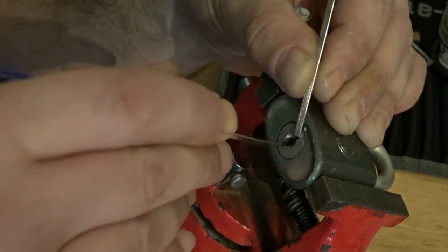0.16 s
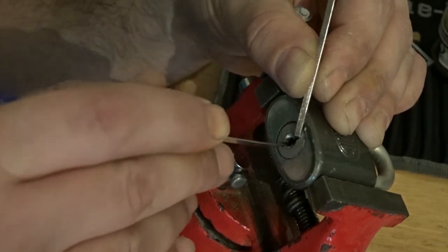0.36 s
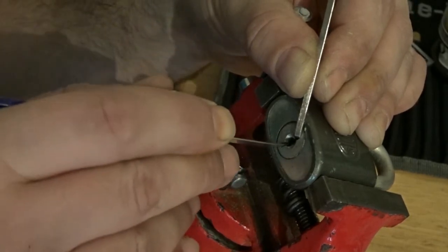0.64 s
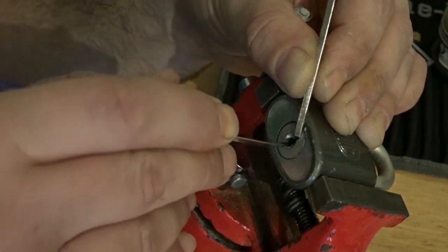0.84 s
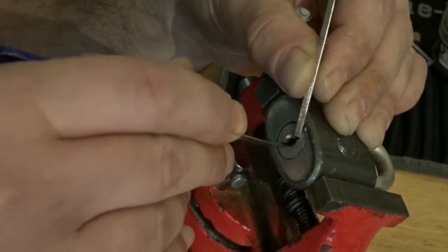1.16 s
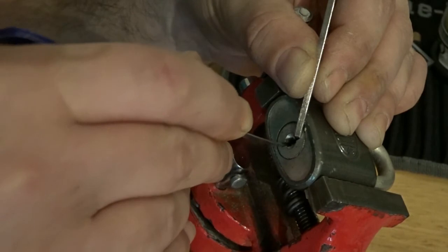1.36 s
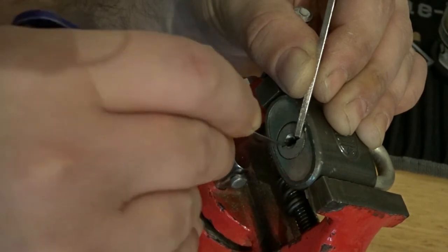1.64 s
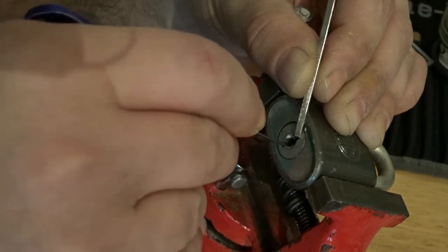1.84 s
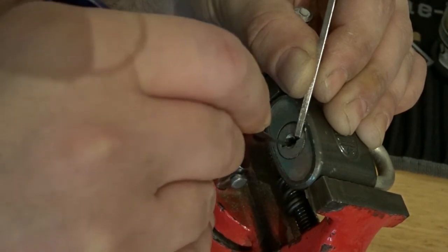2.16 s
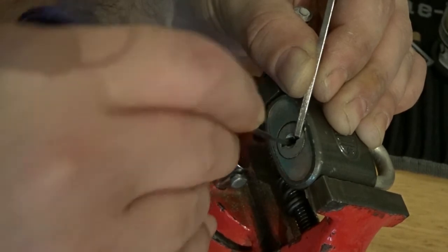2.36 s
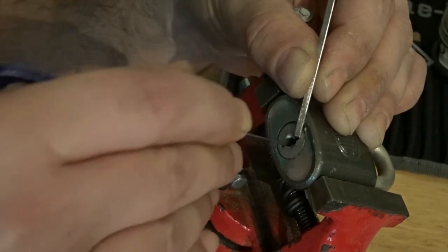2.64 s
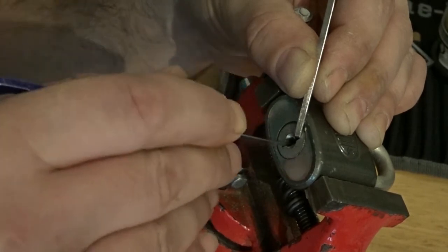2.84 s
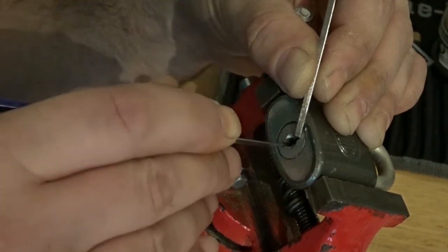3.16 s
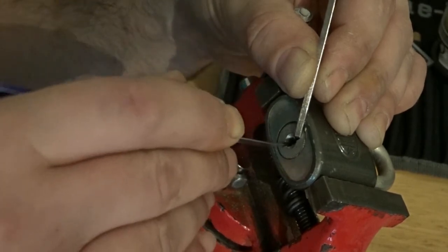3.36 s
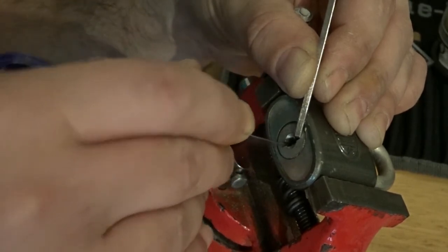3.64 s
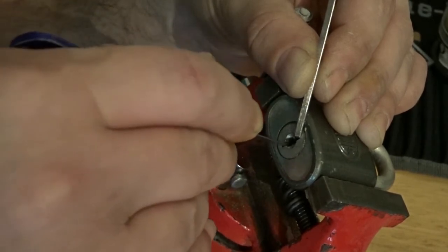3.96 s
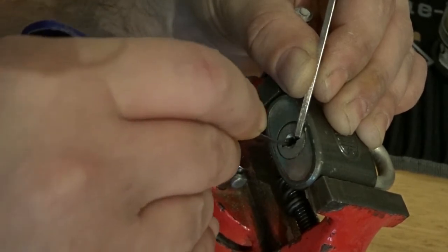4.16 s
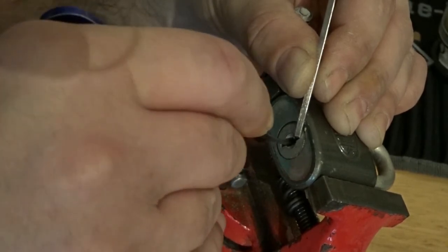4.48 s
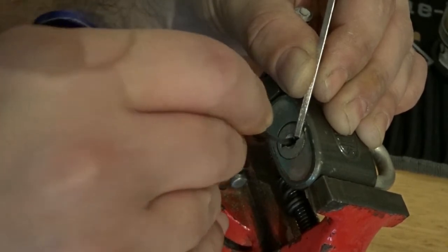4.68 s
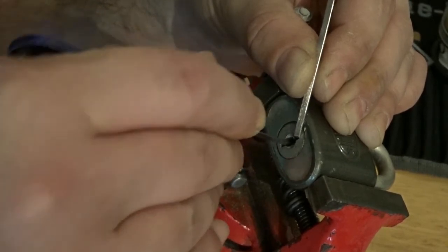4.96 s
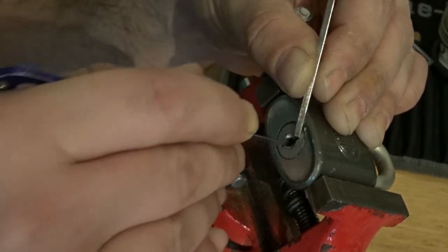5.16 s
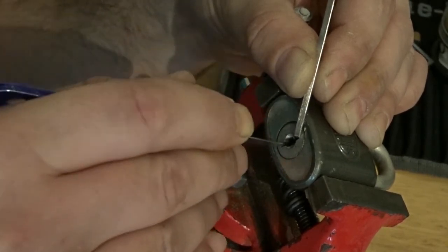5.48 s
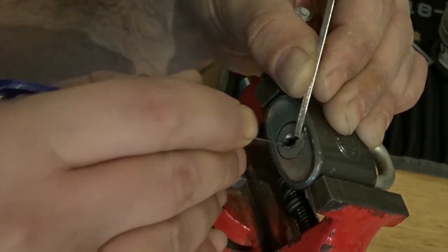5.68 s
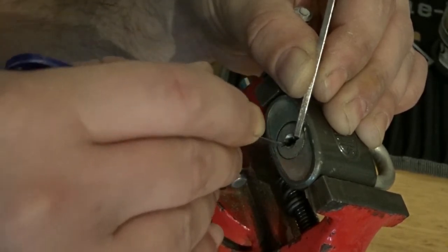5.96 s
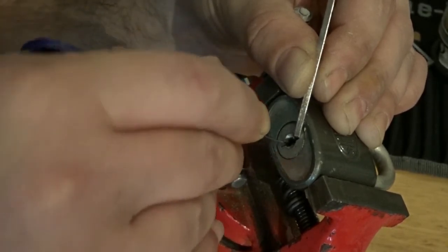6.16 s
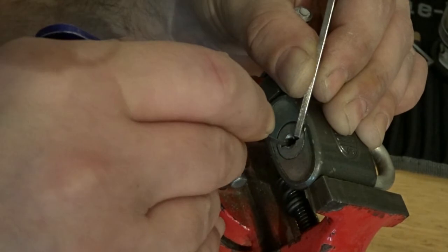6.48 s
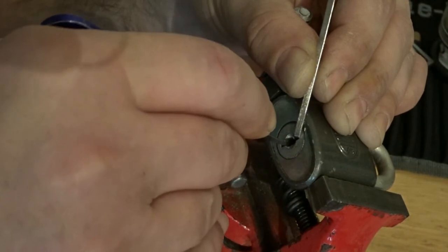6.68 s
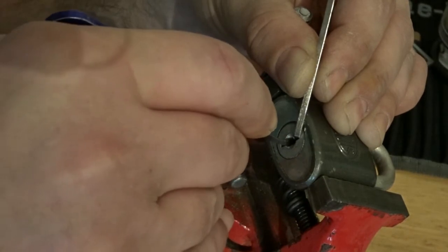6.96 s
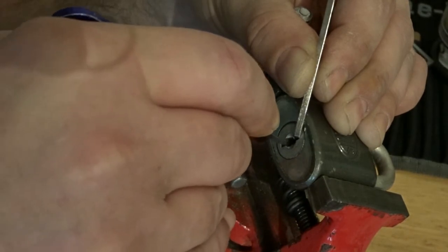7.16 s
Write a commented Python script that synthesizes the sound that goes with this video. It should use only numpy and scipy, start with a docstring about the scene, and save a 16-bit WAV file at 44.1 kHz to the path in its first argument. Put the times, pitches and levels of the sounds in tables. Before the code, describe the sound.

A pick slips inside a clamped padlock with irregular ringing clicks and soft bench thumps, until the lock snaps open.

```python
"""A padlock is picked in a bench vice, close up and in stereo, over a small workshop's faint hum and hiss.
From 0.4 s the pick slips off the pins in scattered clicks: each snaps, rings the thin steel and thumps
the bench, while soft pushes only thud. At 3 s something knocks once further off. A hard slip lands at
4.7 s, lighter ones follow, and near 7.3 s the lock gives way with a loud rattling snap."""
import sys
import numpy as np
from scipy import signal
from scipy.fft import rfft, irfft
from scipy.io import wavfile

SR = 44100
rng = np.random.default_rng(int(sys.argv[2]) if len(sys.argv) > 2 else 0)


def master_out(mix):
    """Clip the mix to full scale and print it as 16-bit PCM to the path in sys.argv[1]."""
    frames = np.transpose(np.atleast_2d(mix))
    ceiling = np.clip(frames, -1, 1)
    pcm = np.round(ceiling * 32767).astype(np.int16)
    wavfile.write(sys.argv[1], SR, pcm)


N = 322812
HIT_TIME = np.arange(SR // 2) / SR
FILTER_HZ = np.fft.rfftfreq(4096, 1 / SR)

# Cue list, one slip of the pick a row; clack, top and rattle are relative to the snap:
# (time [s], snap [dB], contact decay [s], clack near 1 kHz [dB], top near 13 kHz [dB], bite pitch [Hz],
#  rattle [dB], steel ring [dB], steel pitch [ratio], bench thump [dB])
SLIPS = [ (0.3860, -25.5, 0.0015, -2.5, -20, 8420, -7, -30, 1, -4),
         (0.4241, -7.5, 0.0034, -10, -2.5, 4750, -17, 6.5, 0.97, 2.5),
         (0.5810, -30, .003, 0.5, -12, 5170, -10, -21, 1.25, -23),
         (2.2862, -37, 0.002, 3, -19, 4500, -11, -40, 1.1, -35),
         (2.4590, -45, .002, 2, -16, 4800, -8, -23, .98, -28),
         (2.5010, -28.5, 0.0025, -11, -15, 4920, -7, -16, 1.02, -13.5),
         (2.5880, -16.5, 0.0014, -4, -7, 4800, -8.5, -8, 1.025, 0),
         (4.6927, -3, 0.0045, 2.5, -2.5, 6250, -15, -21, 1.04, 12),
         (5.4670, -18, .0027, -4, 6.5, 4890, -9, -5.5, .99, 2.5),
         (6.1066, -40, .0025, 0, -13, 7550, 0, -27, .96, -29),
         (7.182, -17.5, .0055, 1.5, 1, 8240, -3.5, -1.5, 1.02, -3),
         (7.2580, -25, .0016, 6, -40, 5570, -16, -9, 0.96, -2),
         (7.2680, 4, 0.00083, -30, -4, 5560, -2.5, -15, 0.52, 1),
         (7.2695, 0.5, 0.0016, -2, 2, 8100, 2, -12, 0.61, 13.5),
         (7.296, -3, 0.00093, 0, -4, 7200, 3, -12, 1, 8.5), ]
# Bright, hard EQ of the snap: (frequency [Hz], gain [dB])
SNAP_EQ = [(40, -43), (200, -11), (750, -5), (1100, 1.5), (2000, -3), (3300, -2), (4100, -4), (5000, -2.5),
           (6700, -3.5), (7700, -10.5), (8600, -5.5), (10500, -9), (12700, -5.5), (14000, -11), (15300, -7),
           (16000, -12)]
# Metallic ring of lock body and vice jaws: (frequency [Hz], level [dB], t60 [s])
LOCK_MODES = [(768, 2, 0.12), (992, 6.5, 0.14), (1017, 4, 0.054), (1296, 1, 0.32), (1633, 6, 0.44),
              (1769, 8, 0.26), (1968, 9.5, 0.2), (2255, 2.5, 0.14), (2434, -0.5, 0.14)]
# Short ping of pick and tension wrench, damped by the fingers: (base frequency [Hz], level [dB], t60 [s])
STEEL_MODES = [(2616, -3, 0.016), (2740, 1, 0.033), (2855, -5.5, 0.021), (3500, -26, 0.066),
               (4517, -16, 0.028), (5440, -20, 0.023), (7350, -14, 0.0295), (8070, -10.5, 0.043)]

def pin_slips(steel_lag_s=0.001561, bench_lag_s=0.0018):
    """A pin slips: a hard snap, a rattle of loose parts, then lock body, steel and bench ring on."""
    out = np.zeros((2, N))
    for s, snap_db, contact_s, clack_db, top_db, _, rattle_db, steel_db, pitch, thump_db in SLIPS:
        contact = burst(decay_s=contact_s, width=0.36, grain_db=4.5)
        rattle = amp(rattle_db) * burst(decay_s=0.085, width=1.8, grain_db=3.5)
        hardness_db = curve([(1700, clack_db), (4500, 0), (8000, 0), (13000, top_db)], FILTER_HZ)
        snap = equalise(contact + rattle, curve(SNAP_EQ, FILTER_HZ) + hardness_db)
        add(out, s, amp(snap_db) * snap)
        add(out, s, amp(snap_db + clack_db) * ring(LOCK_MODES))
        # the pick's free length, and so its pitch, changes with its depth in the keyway
        steel = ring([(hz * pitch, db, t60) for hz, db, t60 in STEEL_MODES])
        add(out, s + steel_lag_s, amp(steel_db) * steel)
        # harder thumps reach further down into the bench
        thump = bench(deep_db=-5 + 0.28 * thump_db, top_db=0, sustain=0.98)
        add(out, s + bench_lag_s, amp(thump_db) * thump)
    return out


def pin_bites(above_snap_db=5.5, t60_s=0.0069, detune=0.034):
    """Each pin has a brief pair of resonances that the keyway beams straight at the listener."""
    out = np.zeros((2, N))
    for s, snap_db, _, _, _, hz, *_ in SLIPS:
        bite = ring([(hz * (1 - detune), 0, t60_s), (hz * (1 + detune), 0, t60_s)])
        add(out, s, amp(snap_db + above_snap_db) * bite)
    return out


# Woody low end of the vice on its bench: (frequency [Hz], base level [dB], base t60 [s])
BENCH_MODES = [(105, -8, 0.077), (146.5, 0, 0.29), (198.7, -0.5, 0.168), (292, 0, 0.11), (336, -4, 0.11),
               (388.5, 5.5, 0.097), (446.8, 2.5, 0.13), (609, -6.5, 0.057), (676, -11, 0.11)]

def bench(deep_db, top_db, sustain, attack_cycles=0.91):
    """A low thump whose deepest tones swell in last."""
    out = np.zeros(len(HIT_TIME))
    for k, (hz, db, t60) in enumerate(BENCH_MODES):
        tilt_db = curve([(170, deep_db), (320, 0), (430, 0), (600, top_db)], hz)
        mode = sustain * ring([(hz, db + tilt_db, t60 * sustain)])
        attack = 1 - np.exp(-HIT_TIME * hz / attack_cycles)
        out += (-1) ** k * mode * attack
    return out


# Dull thuds with no snap on top: (time [s], level [dB], deep-mode gain [dB])
PUSHES = [ (0.392, -9, -8), (0.402, 2.5, -16), (0.573, -3, -10), (0.592, -3.5, -5), (2.285, 1.5, 9.5),
          (2.308, -9, 5), (2.328, -15.5, 15.5), (2.369, -3.5, -16), (3.168, -3.5, -1), (4.246, -12, -4),
          (4.317, -6, -3), (5.034, -1.5, -13), (5.066, -4.5, -2), (5.087, -4, -6), (5.728, -7, 2), ]

def soft_pushes():
    """The pushing hand shakes the bench, softens its upper modes and shortens its ring."""
    out = np.zeros((2, N))
    for s, db, deep_db in PUSHES:
        add(out, s, amp(db) * bench(deep_db, top_db=-2, sustain=0.78))
    return out


# Two blows that fuse into one knock, off to the left: (time [s], level [dB], left over right [dB])
KNOCK_BLOWS = [(3.0387, -6, 5.5), (3.0470, -4, -1)]
# Dark, boxy EQ of the knock: (frequency [Hz], gain [dB])
KNOCK_EQ = [(80, -9), (200, -10.5), (305, 5), (420, -1.5), (600, 0.5), (1150, -6.5), (1650, -13),
            (2300, -12.5), (3500, -22.5), (6000, -35), (15000, -57.5)]

def far_knock():
    """A soft, woody double blow with no ring of its own."""
    out = np.zeros((2, N))
    for s, db, pan_db in KNOCK_BLOWS:
        contact = burst(decay_s=0.0092, width=0.095, grain_db=-1.0)
        blow = equalise(contact, curve(KNOCK_EQ, FILTER_HZ))
        add(out, s, amp([[db + pan_db / 2], [db - pan_db / 2]]) * blow)
    return out


# Early reflections off bench, hands and nearby gear: (delay [s], gain [ratio])
REFLECTIONS = [(.0013, 0.21), (.0029, 0.46), (.0047, 0.14), (.0072, 0.35), (.0091, .2), (0.03, 0.15)]

def early_reflections(x):
    """Near surfaces scatter the treble back, a little earlier on one side than on the other."""
    treble = signal.sosfilt(signal.butter(2, 900, "high", fs=SR, output="sos"), x)
    skews_s = 0.0001 * rng.uniform(-1.1, 1, len(REFLECTIONS))
    out = np.zeros((2, N))
    for (delay, gain), skew in zip(REFLECTIONS, skews_s):
        add(out, delay + skew, gain * treble * [[1], [0]])
        add(out, delay - skew, gain * treble * [[0], [1]])
    return out


# Reverb image, centred in the lows and wide on top: (frequency [Hz], left-right correlation [0-1])
REVERB_IMAGE = [(60, 0.99), (400, 0.95), (700, 0.95), (1400, 0.98), (3100, 0.54), (6000, 0), (15000, 0)]
# Short decay of the workshop: (frequency [Hz], t60 [s])
REVERB_DECAY = [(200, .5), (530, 0.45), (1400, 0.78), (3700, 0.58), (9700, 0.69), (15000, 0.24)]
# Tone of the tail: (frequency [Hz], gain [dB])
REVERB_EQ = [(150, 2.5), (400, 0.5), (800, 2), (1700, 2), (4000, -1), (9000, -2), (15000, 2.5)]

def workshop_reverb(x, build_s=0.0023):
    """Dense reflections build up quickly and die at their own speed in each band."""
    noise = stereo_image(rng.standard_normal((2, SR)), REVERB_IMAGE)
    hz, t, bands = signal.stft(noise, SR, nperseg=256)
    rate = np.log(1000) / curve(REVERB_DECAY, hz)[:, None]
    decay = np.exp(-rate * t) * np.sqrt(2 * rate / SR)  # same energy for any t60
    bands *= amp(curve(REVERB_EQ, hz))[:, None] * decay
    tail = signal.istft(bands, SR, nperseg=256)[1][:, :SR]
    attack = 1 - np.exp(-(np.arange(SR) / SR / build_s) ** 2)
    return signal.fftconvolve(x, tail * attack, axes=1)[:, :N]


# Fader ride of the workshop's low drone: (time [s], level before trim [dB])
DRONE_FADER = [(0.0, -83), (0.34, -67), (0.92, -79.5), (1.06, -64.5), (1.84, -77), (2.12, -68), (3.18, -75),
               (3.64, -71), (4.22, -84), (4.48, -70), (4.74, -68), (4.94, -87), (5.38, -62.5),
               (5.58, -75.5), (6.58, -66.5), (6.96, -84.6), (7.29, -76)]
# Faint bed of hum: (frequency [Hz], level [dB], waver depth [ratio])
HUM_TONES = [(47.4, -79, 0.28), (97.4, -81, .4), (197.4, -81.5, 0.31)]

def workshop_hum(drone_trim_db=1.0, rumble_peak_s=1.84, rumble_spread_s=0.97):
    """Faint low tones, with a drone that swells and fades and a deep rumble that rises once."""
    t = np.arange(N) / SR
    drone_db = drone_trim_db + np.interp(t, *np.transpose(DRONE_FADER))
    drone = amp(drone_db) * wavering_tone(hz=145.6, waver=0.12)
    swell = np.exp(-((t - rumble_peak_s) / rumble_spread_s) ** 2)
    rumble = amp(-80.5 + 14.5 * swell) * wavering_tone(hz=45, waver=0.27)
    hum = sum(amp(db) * wavering_tone(hz, waver) for hz, db, waver in HUM_TONES)
    return drone + rumble + hum


# Bass-heavy EQ of the room tone: (frequency [Hz], gain [dB])
HISS_EQ = [(12, -15), (20, -16), (48, -6.5), (70, -9.5), (110, -13.5), (190, -14.5), (290, -14.5),
           (400, -12.5), (520, -16.5), (920, -15.5), (1030, -22), (3000, -23), (4000, -26), (10000, -32),
           (16000, -40)]
# Narrow resonances that colour it: (centre [Hz], width [Hz], boost [dB])
HISS_PEAKS = [(399, 34, 4.5), (439, 17.6, 6.5), (1650, 210, 3.5), (1960, 160, 5), (3260, 68, 4.5)]
# Its image, mono in the bass and wide above: (frequency [Hz], left-right correlation [0-1])
HISS_IMAGE = [(60, 1), (130, .97), (290, .8), (640, .3), (1400, 0), (15000, 0)]

def room_hiss(level_db=-63):
    """Even room noise, raised a little at a few resonances."""
    f = np.fft.rfftfreq(N, 1 / SR)
    peaks_db = sum(db / (1 + (2 * (f - hz) / width) ** 2) for hz, width, db in HISS_PEAKS)
    noise = stereo_image(rng.standard_normal((2, N)), HISS_IMAGE)
    hiss = irfft(rfft(noise) * amp(curve(HISS_EQ, f) + peaks_db), N)
    return amp(level_db) * unit_rms(hiss)


def burst(decay_s, width, grain_db):
    """A dying cluster of tiny contacts of energy 1; width sets how much left and right differ."""
    centre, left, right, sizes = rng.standard_normal((4, len(HIT_TIME)))
    grains = amp(grain_db * np.repeat(sizes, 32)[:len(HIT_TIME)])
    noise = centre + width * np.array([left, right])
    return unit_rms(noise * grains * np.exp(-HIT_TIME / decay_s)) / np.sqrt(len(HIT_TIME))


def ring(modes):
    """Dying modes, levelled by resonance peak; neighbours swing in opposite senses, swell and beat."""
    out = np.zeros(len(HIT_TIME))
    for k, (hz, db, t60) in enumerate(modes):
        rate = np.log(1000) / t60
        envelope = amp(db) * 2 * rate / SR * np.exp(-rate * HIT_TIME)
        out += (-1) ** k * envelope * np.sin(2 * np.pi * hz * HIT_TIME)
    return out


def wavering_tone(hz, waver):
    """A tone of rms 1 whose level and phase wander."""
    t = np.arange(N) / SR
    knots = np.linspace(0, t[-1], 36)
    swell, drift = (np.interp(t, knots, v) for v in rng.standard_normal((2, len(knots))))
    return unit_rms((1 + waver * swell) * np.sin(2 * np.pi * hz * t + 2 * waver * drift))


def equalise(x, gain_db):
    """Minimum-phase EQ over FILTER_HZ, so nothing sounds ahead of the attack."""
    log_gain = np.log(amp(np.maximum(gain_db, -100)))
    mirrored = np.concatenate([log_gain, log_gain[-2:0:-1]])
    response = np.exp(np.conj(signal.hilbert(mirrored)))
    taps = irfft(response[:len(FILTER_HZ)])
    return signal.fftconvolve(x, taps[None], axes=1)[:, :x.shape[1]]


def stereo_image(x, correlation):
    """Blends two unrelated channels to a left-right correlation that varies with frequency."""
    left, other = rfft(x)
    alike = curve(correlation, np.fft.rfftfreq(x.shape[1], 1 / SR))
    right = alike * left + np.sqrt(1 - alike ** 2) * other
    return irfft(np.array([left, right]), x.shape[1])


def curve(points, hz):
    """Reads (frequency, value) breakpoints on a log-frequency axis."""
    f, value = np.transpose(points)
    return np.interp(np.log(hz + 1), np.log(f + 1), value)


def amp(db):
    """Decibels to gain."""
    return 10 ** (np.asarray(db) / 20)


def unit_rms(x):
    """Scales to rms 1."""
    return x / np.sqrt(np.mean(x ** 2) + 1e-20)


def add(mix, s, sound):
    """Mixes a sound in at s seconds."""
    part = mix[:, max(round(s * SR), 0):][:, :sound.shape[-1]]
    part += sound[..., :part.shape[1]]


def scene():
    """The mix: the lock up front, its bites driest, the knock further off and wetter."""
    lock = pin_slips() + soft_pushes()
    bites = pin_bites()
    knock = far_knock()
    reflections = early_reflections(lock + 0.6 * bites)
    reverb = workshop_reverb(lock + amp(-8.5) * bites + amp(2.0) * knock)
    return lock + bites + knock + reflections + reverb + room_hiss() + workshop_hum()


def record(dry):
    """A steep high cut at 16 kHz on the whole mix."""
    high_cut = signal.firwin(255, 16000, window=("kaiser", 9), fs=SR)
    return signal.oaconvolve(dry, high_cut[None], "same", axes=1)


dry = scene()
out = record(dry)
master_out(out)
```